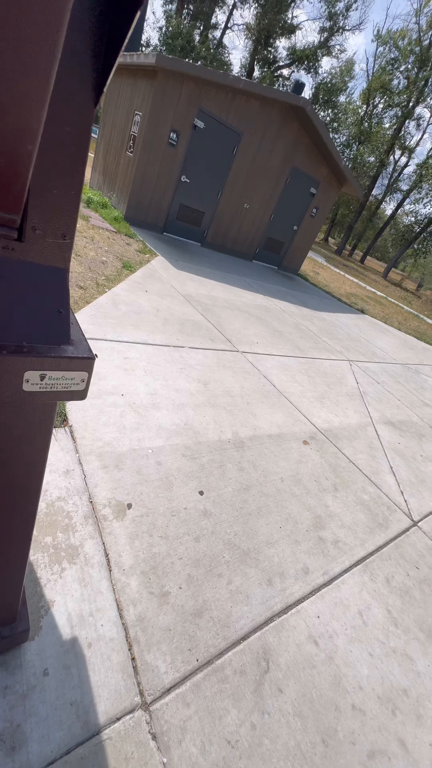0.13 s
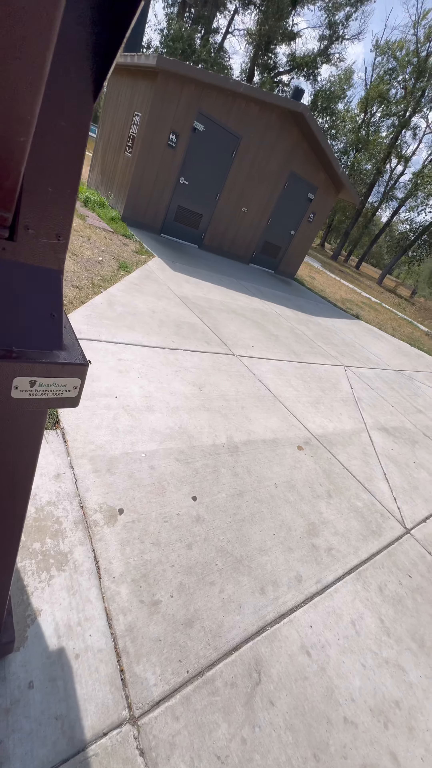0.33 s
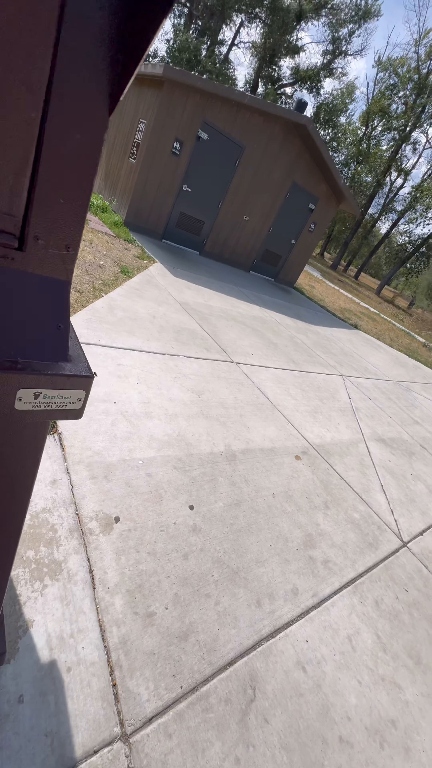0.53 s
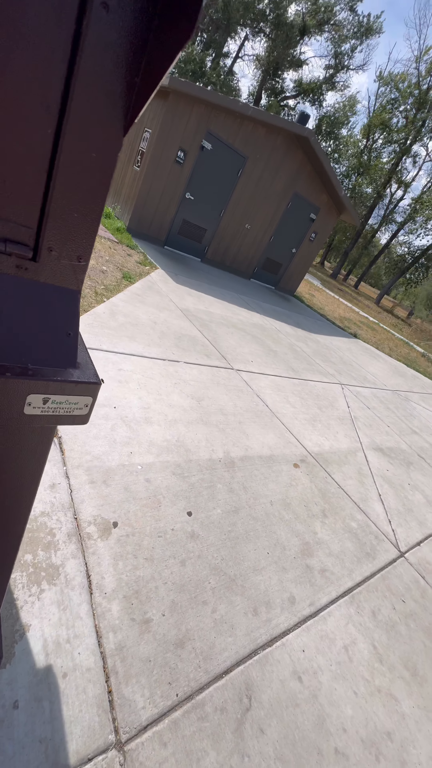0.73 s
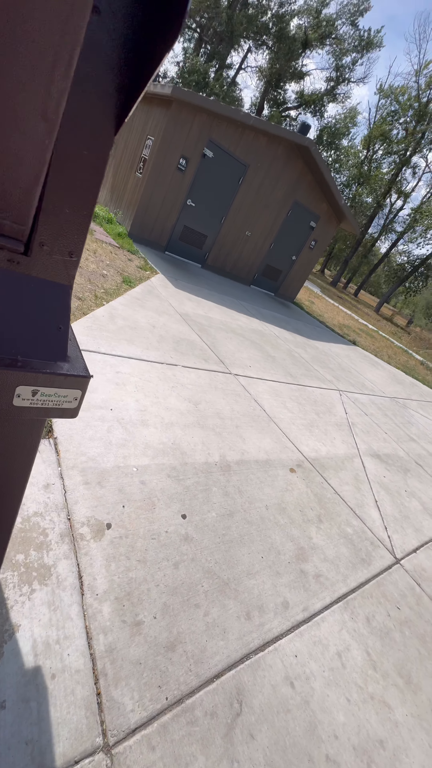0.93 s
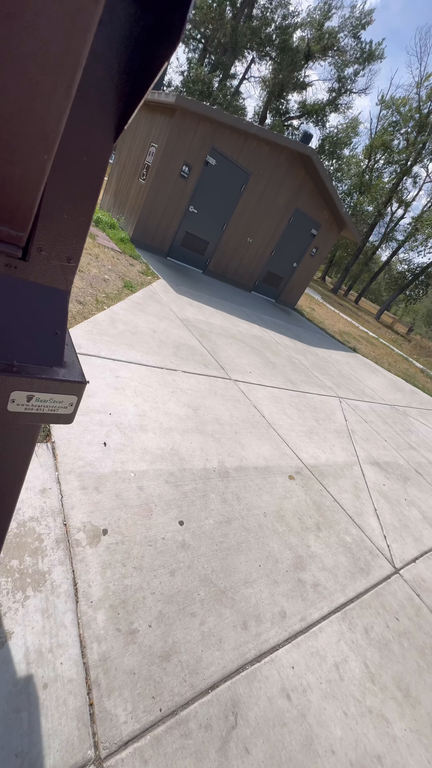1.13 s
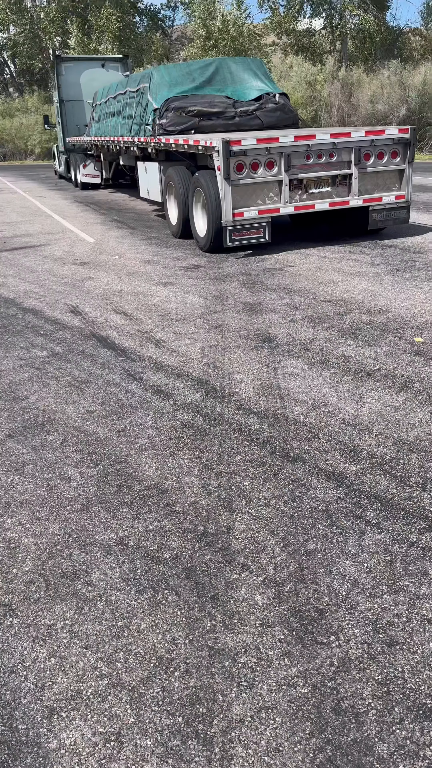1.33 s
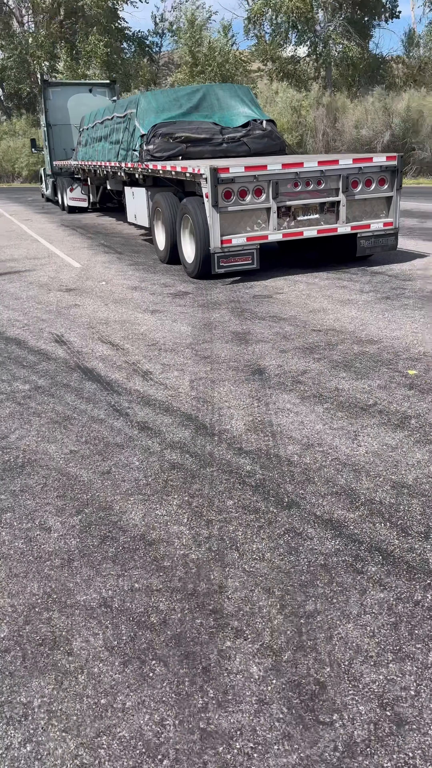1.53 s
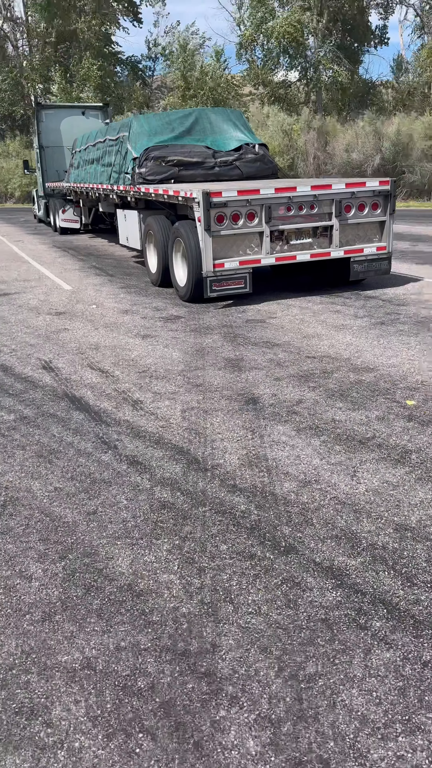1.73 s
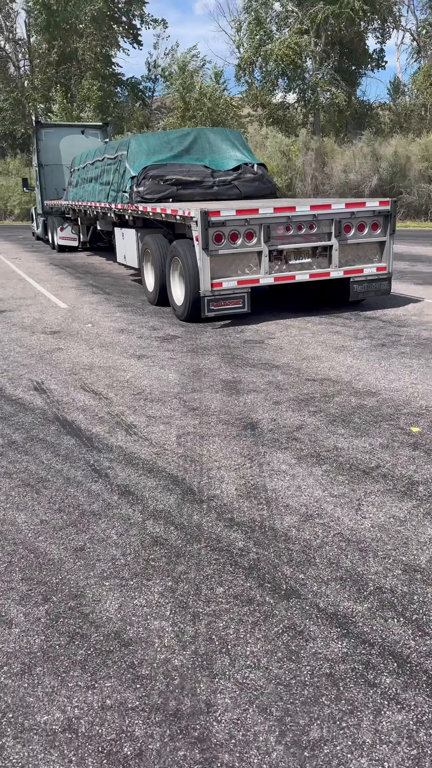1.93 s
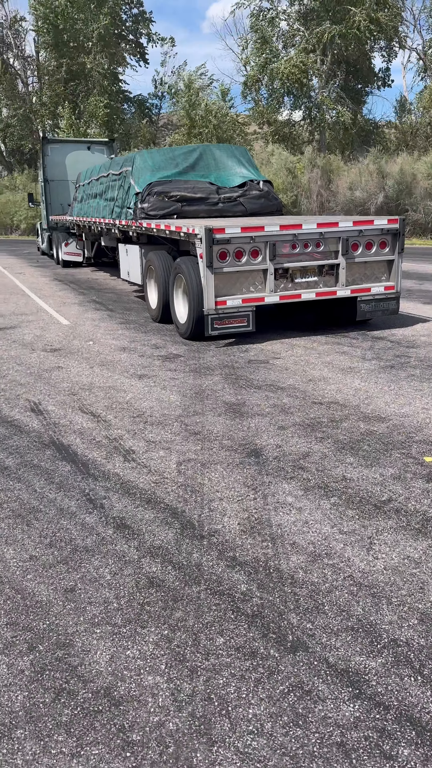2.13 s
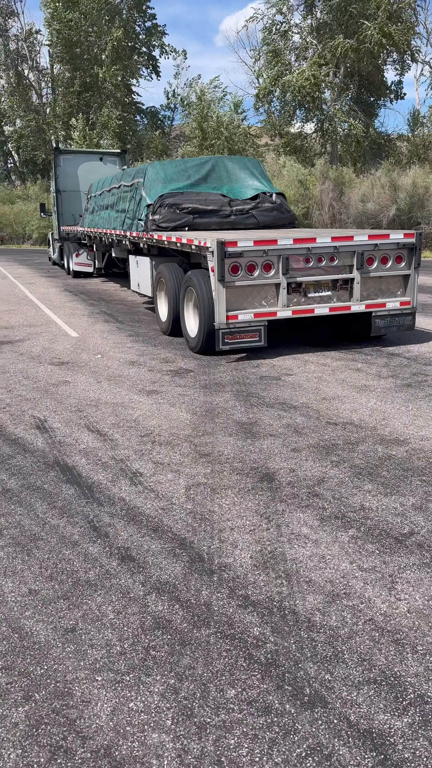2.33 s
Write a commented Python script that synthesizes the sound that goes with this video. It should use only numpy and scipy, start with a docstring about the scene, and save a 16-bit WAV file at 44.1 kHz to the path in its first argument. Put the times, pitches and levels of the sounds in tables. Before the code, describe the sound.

One hard metal lid bang with a quick chatter and booming body dominates, close to a handheld microphone outdoors. Crinkling film and dull knocks surround it; then a hard cut leaves only a steady low truck idle.

```python
"""Steel bin lid and idling diesel

A steel bin lid bangs shut: repeated impacts excite damped modes and noise that decays band by band.
Soft knocks are damped sines and humming panels are wavering ones; a bag rustles as grains of noise.
A diesel idles far off as harmonic orders under coloured noise; at a cut the listener stands near the
truck, the bin is no longer heard, and the idle is close, with metallic ticks in narrow noise bands."""
import sys
import numpy as np
from scipy import signal
from scipy.fft import rfft, irfft, next_fast_len
from scipy.io import wavfile
from scipy.ndimage import map_coordinates

SR = 44100
rng = np.random.default_rng(int(sys.argv[2]) if len(sys.argv) > 2 else 0)


def undo_db(level):
    """Turn decibels back into plain size, where 20 dB means ten times bigger."""
    steps = np.asarray(level, float) / 20
    return 10 ** steps


def materialize(psi):
    """Save the field psi as 16-bit PCM at rate SR to the path in sys.argv[1].

    A 1-D psi becomes a single channel; in a 2-D psi each row is a channel.
    """
    bounded = np.clip(np.atleast_2d(psi).T, -1, 1)
    quanta = np.round(bounded * 32767).astype(np.int16)
    wavfile.write(sys.argv[1], SR, quanta)


N = 105663
TIME = np.arange(N) / SR  # seconds
CUT_S = 1.212


def unit(x):
    """Normalisation: scales a signal to an rms value of 1."""
    return x / np.sqrt(np.mean(x ** 2) + 1e-20)


def along(points, hz):
    """Logarithmic frequency scale: interpolates (frequency [Hz], value) points."""
    f, v = np.transpose(points)
    return np.interp(np.log(hz + 1), np.log(f + 1), v)


def curve(rows):
    """Linear interpolation in time: (time [s], value) rows give one value per sample."""
    return np.interp(TIME, *np.transpose(rows))


def wobble(rate):
    """Slow random modulation: a smooth curve through `rate` normally distributed knots a second."""
    knots = rng.standard_normal(int(N * rate / SR) + 4)
    return map_coordinates(knots, [np.arange(N) * rate / SR])


def filtered(x, response):
    """Linear filtering: multiplies the spectrum by a complex response of frequency."""
    m = next_fast_len(N + 8192)
    return irfft(rfft(x, m) * response(np.fft.rfftfreq(m, 1 / SR)), m)[..., :N]


def noise(spectrum, source=None):
    """Spectral shaping: three independent noises coloured by one spectrum, to a joint rms of 1."""
    white = rng.standard_normal((3, N)) if source is None else source
    return unit(filtered(white, lambda hz: undo_db(along(spectrum, hz))))


def ports(three, phase, alike):
    """Interaural-style coherence: a shared signal with a phase lead plus a private one per port."""
    sides = np.array([[1], [-1]])  # left, right

    def share(hz):
        return np.clip(along(alike, hz), 0, 1)

    common = filtered(three[0], lambda hz: np.sqrt(share(hz)) * np.exp(.5j * along(phase, hz) * sides))
    private = filtered(three[1:], lambda hz: np.sqrt(1 - share(hz)))
    return common + private


def decay(start, t60, rise):
    """Exponential damping: a fall of 60 dB per t60 after a rise with time constant `rise`."""
    t = np.maximum(TIME - start, 0)
    return undo_db(-60 * t / t60) * (1 - np.exp(-t / rise))


def ring(start, hz, t60, rise):
    """Free vibration of a damped resonator: one decaying sine."""
    return np.sin(2 * np.pi * hz * (TIME - start)) * decay(start, t60, rise)


def warped(hz):
    """Mode modulation in buckling sheet: phase and size waver, faster for higher modes within limits."""
    depth_rad, depth_db, cycles = 0.72, 2, 14  # cycles of the mode between random knots
    rate = np.clip(hz / cycles, 12, 60)
    size = undo_db(depth_db * wobble(rate))
    phase = depth_rad * wobble(rate) + rng.uniform(0, 2 * np.pi)
    return size * np.sin(2 * np.pi * hz * TIME + phase)


def firing_phase():
    """Cyclic excitation: the phase of the firing pattern [rad], with a slow drift of its rate."""
    pattern_hz, wander = 19.46, 0.00294  # repeat rate; relative drift
    return 2 * np.pi * np.cumsum(pattern_hz * (1 + wander * wobble(3.3))) / SR


# Engine orders: (multiple of the pattern rate, level [dB])
IDLE_ORDERS = [(3, -42), (4, -44.5), (5, -31.5), (6, -51.5), (7, -30), (8, -32), (9, -41.5), (11, -50.5),
               (12, -44.5), (14, -46.5), (16, -49.5), (22, -48.5), (24, -51)]


def idle_orders(turn):
    """Harmonic series of a cyclic machine: orders that line up loosely once a pattern."""
    swing_db, throb_rad, scatter_rad = 2.5, 3.9, .6
    tones = np.zeros(N)
    for order, db in IDLE_ORDERS:
        size = np.sqrt(2) * undo_db(db + swing_db * wobble(5.96))
        tones += size * np.cos(order * (turn - throb_rad) + scatter_rad * wobble(5))
    return tones


# Distant idle and road as heard: (frequency [Hz], relative density [dB])
FAR_AIR = [(15, -78), (25, -21), (102, -6.5), (165, -11), (179, -11), (200, -11.5), (324, -21),
           (1040, -21.5), (1150, -30), (8490, -45.5), (15800, -96.5)]
# Level changes of the distant idle and road: (time [s], level [dB])
FAR_SWELL = [(0, -2.5), (.12, 1), (.25, -2), (.4, -2.5), (.58, 2.3), (1.2, 1.8)]
# Phase lead of the left port: (frequency [Hz], lead [rad])
FAR_PHASE = [(60, .2), (250, 0.44), (600, 1.06), (1300, 1), (2500, 0.77), (4000, 0.77), (6000, 1.5),
             (9000, 2.25), (14000, 3)]
# Power shared by the ports, also for rustle and bin: (frequency [Hz], share [1])
FAR_ALIKE = [(60, 0.89), (250, 1), (700, 0.95), (2000, 0.95), (5000, 0.36), (12000, 0.73)]


def far_idle(tones):
    """Superposition of weak periodic orders and a fluctuating broadband noise of engine and road."""
    level_db, tones_db = -36, -14
    level = undo_db(level_db + curve(FAR_SWELL) + wobble(11.1))
    return undo_db(tones_db) * tones + level * ports(noise(FAR_AIR), FAR_PHASE, FAR_ALIKE)


# Rustle level in two successive lists: (time [s], level [dB])
RUSTLE = [
    [(0, -47), (.13, -49), (.18, -61.5), (.28, -76), (.36, -58), (.41, -46.5), (.51, -51), (.565, -45),
     (.615, -36)],
    [(.78, -56.5), (.86, -44.5), (.94, -43), (.99, -35), (1.05, -44.5), (1.08, -56.5), (1.13, -47),
     (1.21, -48.5)],
]
# Rustle as finally heard, all but empty at about 10.8-13.2 kHz, a gap that is not the film's own:
# (frequency [Hz], relative density [dB])
RUSTLE_COLOUR = [(710, -32.5), (1200, -14.5), (3200, -4), (5000, -8), (8920, -7.5), (10000, -12.5),
                 (10800, -96), (13200, -64), (13900, -6.5), (15800, -17)]


def rustle():
    """Granular excitation: crinkling film as dense random grains over a steady noise floor."""
    grains_per_s, spread_db = 2500, 2.5
    struck = rng.random(N) < grains_per_s / SR
    size = .5 + struck * undo_db(spread_db * rng.standard_normal(N))
    grains = rng.standard_normal((3, N)) * size
    level = undo_db(curve(RUSTLE[0] + RUSTLE[1]) + 0.5 * wobble(39.85))
    return ports(level * noise(RUSTLE_COLOUR, grains), FAR_PHASE, FAR_ALIKE)


# Single ticks of the film: (time [s], relative level [dB], centre frequency [Hz], t60 [s])
TICKS = [(.095, -38, 6000, 0.12), (.142, -34, 6060, 0.09), (.303, -42, 5500, 0.063),
         (0.529, -29.5, 3480, 0.098), (0.817, -31.5, 5980, .03), (0.962, -28, 3200, 0.082),
         (1.115, -41, 5000, .04), (1.177, -36.5, 3500, .07)]


def film_ticks():
    """Impulsive excitation: each tick is a broad resonance band of noise that dies away."""
    film = noise(RUSTLE_COLOUR)
    out = np.zeros((3, N))
    for start, db, hz, t60 in TICKS:
        band = unit(filtered(film, lambda f: f * hz / (f ** 2 + hz ** 2)))
        out += undo_db(db - 2.5) * decay(start, t60, 0.00049) * band
    return ports(out, FAR_PHASE, FAR_ALIKE)


# Soft knocks on the bin: (time [s], level [dB], frequency [Hz], t60 [s])
KNOCKS = [(.143, -22, 210, 0.084), (0.142, -25.5, 372, 0.055), (0.146, -31, 550, 0.06),
          (0.876, -25, 490, 0.087), (0.917, -22.5, 526, .08), (1.046, -30, 350, 0.082),
          (1.092, -25.5, 181, 0.14), (1.18, -31, 457, .07)]


def knocks():
    """Impulse response: each soft blow leaves the bin in damped free vibration."""
    return sum(undo_db(db) * ring(start, hz, t60, 0.0016) for start, db, hz, t60 in KNOCKS)


# Lid meets rim, then chatters: (time [s], level [dB])
BLOWS = [(0.6214, -14), (0.627, -18), (.633, -23), (.645, -21), (.657, -23), (.697, -32.5)]
# Spectrum of the rumbling bin body: (frequency [Hz], relative density [dB])
SHUDDER = [(24, -45), (40, -28), (75, -12), (114, -19), (211, -8.5), (244, -4.5), (1170, -31.5),
           (3000, -46), (3900, -61), (6600, -120)]


def shudder():
    """Reverberant decay: the bin body rumbles on in low noise of uneven level."""
    level_db, lumps_db, t60 = -28.5, 5.5, 2.36
    level = undo_db(level_db + lumps_db * wobble(25))
    return level * decay(BLOWS[0][0], t60, 0.025) * noise(SHUDDER)


# Lid crash as finally heard, with a gap near 11.7 kHz that is not the steel's own:
# (frequency [Hz], relative density [dB])
CRASH = [(35, -27.5), (60, -18), (576, -6.5), (1030, -17), (1720, -21.5), (6670, -21), (10100, -24.5),
         (11700, -106), (13700, -29.5), (15800, -37)]
# Decay of the lid crash: (frequency [Hz], t60 [s])
CRASH_T60 = [(100, 0.84), (400, 0.36), (1200, 0.49), (3000, 0.25), (8000, 0.18)]


def crash():
    """High modal density: upper modes merge into noise that decays at its own rate in each band."""
    out = np.zeros((3, N))
    rise = 1 - np.exp(-np.arange(SR) / SR / 0.00068)
    for start, db in BLOWS:
        hz, t, z = signal.stft(noise(CRASH)[:, :SR], SR, nperseg=256)  # one second per blow
        damped = z * undo_db(-60 * t / along(CRASH_T60, hz)[:, None])
        tail = signal.istft(damped, SR, nperseg=256)[1][:, :SR]
        out[:, round(start * SR):][:, :SR] += undo_db(db) * tail * rise
    return out


def loose_contact():
    """Amplitude modulation: loose contact breaks up the sound, less and less after the first blow."""
    depth_db = 1.5
    return undo_db(depth_db * wobble(130) * decay(BLOWS[0][0], 0.95, 0.0029))


# Modes of lid and bin body: (frequency [Hz], level relative to the blow [dB], t60 [s])
STEEL = [(61, -1, .6), (136.8, -2.5, 0.25), (212, -12, 0.24), (291, -11, 0.98), (350, -10, 0.67),
         (388, -7, 0.28), (533, -22, 0.26), (665.7, -14, 0.15), (828, -13.5, 0.43), (1017, -11, 0.43),
         (1159, -12.5, 0.46), (2406, -19.5, 0.3), (3020, -13.5, 0.27)]


def steel_modes():
    """Modal superposition: every blow adds energy to each damped mode of lid and bin."""
    out = np.zeros(N)
    for hz, gain, t60 in STEEL:
        energy = sum((undo_db(db + gain) * decay(start, t60, .7 / hz)) ** 2 for start, db in BLOWS)
        out += np.sqrt(energy) * warped(hz)
    return out


def snap():
    """Transient response: one strong, heavily damped sine just after the first blow."""
    start, db = BLOWS[0]
    over_blow_db, hz, t60 = 11.5, 628, 0.027
    return undo_db(db + over_blow_db) * ring(start + 0.00215, hz, t60, 0.00073)


# A panel hums up and fades: (start [s], frequency [Hz], level [dB], rise [s], t60 [s])
HUMS = [(0.861, 289.4, -19, .03, 0.24), (.955, 212, -22, 0.013, 0.72)]


def hums():
    """Resonance build-up: panel modes swell gradually and then decay."""
    return sum(undo_db(db) * decay(start, t60, rise) * warped(hz) for start, hz, db, rise, t60 in HUMS)


# Phase lead of the left port for the bin: (frequency [Hz], lead [rad])
LID_PHASE = [(60, .2), (250, 0.13), (600, 1.07), (1300, 0.95), (2500, 0.27), (4000, 0.62), (6000, 0.97),
             (9000, 1.85), (14000, 2.6)]
# Stereo balance of the bin: (frequency [Hz], left minus right [dB])
LID_LEAN = [(60, -0.5), (300, -2), (600, -1), (2000, 5), (4500, -1), (9000, 0.8)]


def bin_and_lid():
    """Linear superposition of the bin's sounds, placed by phase and level differences."""
    out = (shudder() + crash()) * loose_contact()
    out[0] += knocks() + steel_modes() + snap() + hums()  # modes go to the shared signal
    pair = ports(out, LID_PHASE, FAR_ALIKE)
    halves = np.array([[.5], [-.5]])
    return filtered(pair, lambda hz: undo_db(along(LID_LEAN, hz) * halves))


# Metal parts ticking with the firing pattern: (frequency [Hz], width [Hz], relative level [dB])
TAPPETS = [(2830, 700, -55.5), (3700, 340, -61), (4460, 440, -62.5), (7150, 900, -66.5)]
# Phase lead of the left port near the truck: (frequency [Hz], lead [rad])
NEAR_PHASE = [(60, 0.095), (250, .5), (600, 1.43), (1300, 1.08), (2500, 1.03), (4000, 0.54), (6000, 0.65),
              (9000, 2.1)]
# Power shared by the ports near the truck: (frequency [Hz], share [1])
NEAR_ALIKE = [(60, 1), (250, 0.99), (700, 0.64), (2000, 0.98), (5000, 0.57), (12000, 1)]


def tappets(turn):
    """Periodic modulation of narrow-band noise: each band swells once a pattern and by chance."""
    lag_rad, jitter_rad, sharpness = 1.7, .5, 1.6
    beat = unit((.5 + .5 * np.cos(turn - lag_rad + jitter_rad * wobble(9.5))) ** sharpness)
    bands = np.zeros((3, N))
    for hz, width, db in TAPPETS:
        white = rng.standard_normal((3, N))
        band = unit(filtered(white, lambda f: np.exp(-((f - hz) / width) ** 2)))
        bands += undo_db(db + 2.2 * wobble(22.07)) * beat * band
    return ports(bands, NEAR_PHASE, NEAR_ALIKE)


# Close engine roar as finally heard, all but empty above about 10 kHz, which is not the engine's own:
# (frequency [Hz], relative density [dB])
NEAR_AIR = [(15, -70.5), (25, -37.5), (86, -6.5), (141, -11), (205, -12.5), (333, -23), (414, -18),
            (513, -23.5), (834, -24), (4450, -42), (7630, -50), (9460, -53), (10300, -108), (15800, -91)]


def near_idle(tones, turn):
    """Superposition of periodic orders, steady broadband roar and pulsed metallic noise."""
    roar_db = -31
    roar = ports(noise(NEAR_AIR), NEAR_PHASE, NEAR_ALIKE)
    return tones + undo_db(roar_db) * roar + tappets(turn)


def engine():
    """Common source: one firing cycle drives the far idle, then the near idle after the cut."""
    turn = firing_phase()
    tones = idle_orders(turn)
    near = np.clip((TIME - CUT_S) / 0.0013, 0, 1)
    lean = undo_db([[-.6], [.6]])  # slightly stronger at the right
    return lean * ((1 - near) * far_idle(tones) + near * near_idle(tones, turn))


def scene():
    """Superposition in time: bin and bag sound only before the cut, the engine throughout."""
    before_cut = np.clip((CUT_S - TIME) / .003, 0, 1)
    return engine() + (rustle() + film_ticks() + bin_and_lid()) * before_cut


def low_pass(x):
    """Removes everything above the highest recorded frequency."""
    return signal.sosfilt(signal.butter(12, 16470, fs=SR, output="sos"), x)


def record(dry):
    """Band limitation: the phone passes only frequencies below a sharp upper limit."""
    top_hz = 15900
    mix = filtered(dry, lambda hz: hz < top_hz)
    return low_pass(mix)


dry = scene()
out = record(dry)
materialize(out)
```